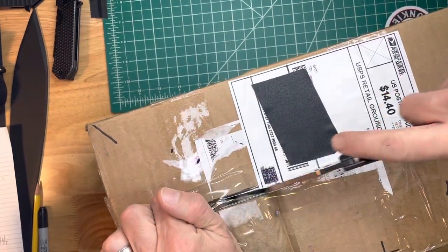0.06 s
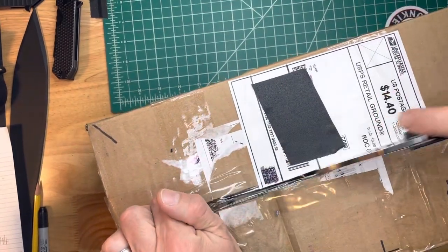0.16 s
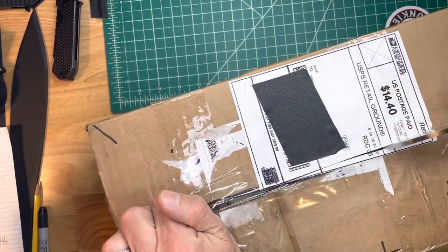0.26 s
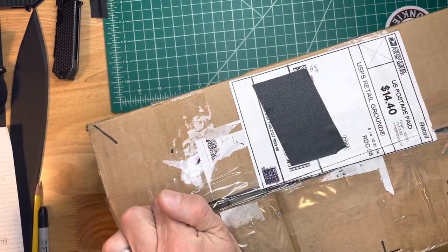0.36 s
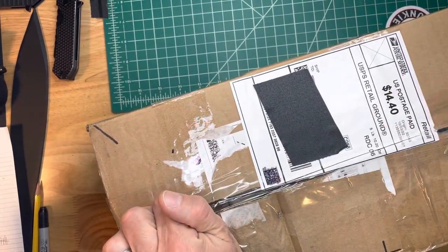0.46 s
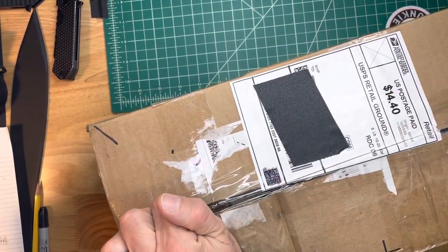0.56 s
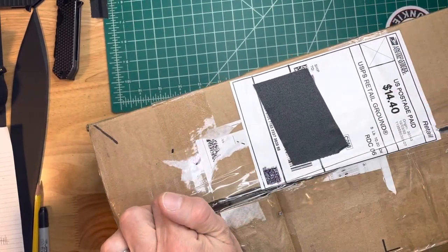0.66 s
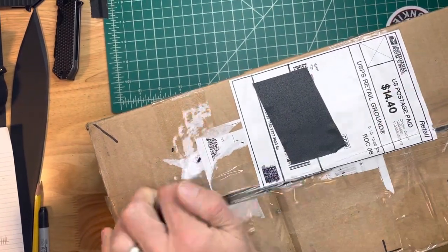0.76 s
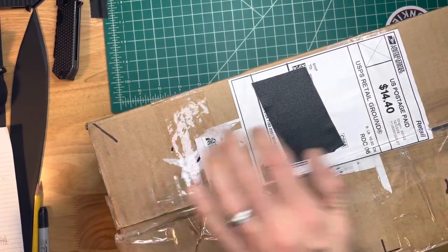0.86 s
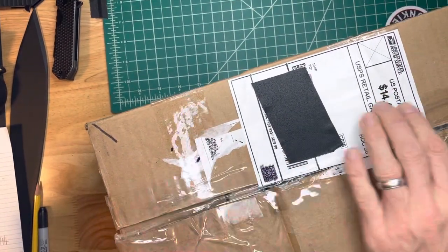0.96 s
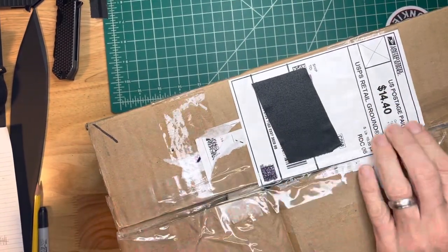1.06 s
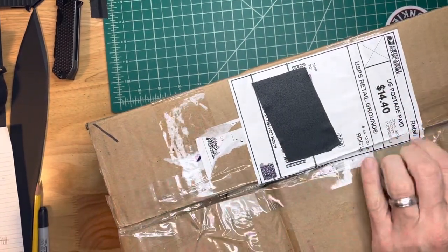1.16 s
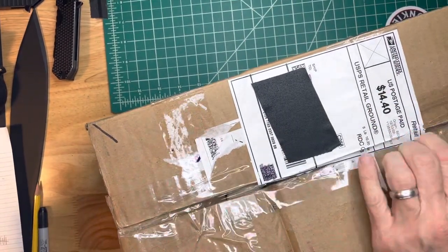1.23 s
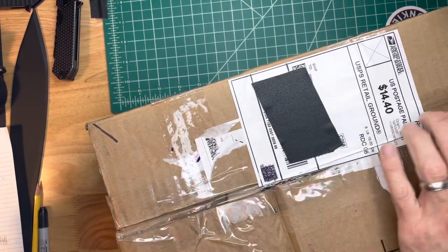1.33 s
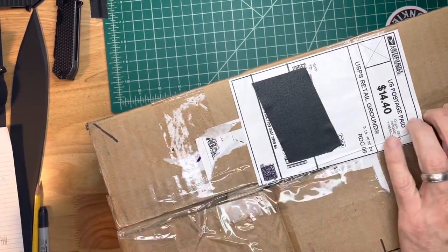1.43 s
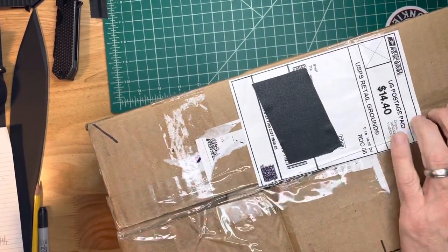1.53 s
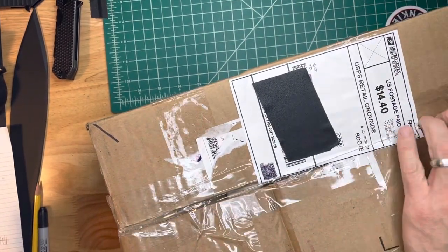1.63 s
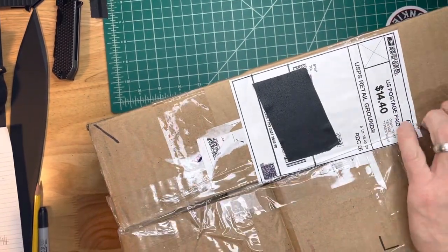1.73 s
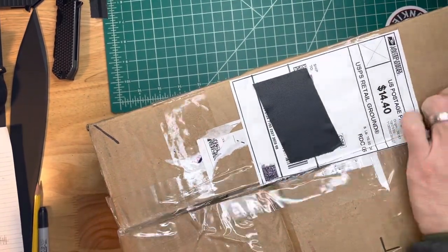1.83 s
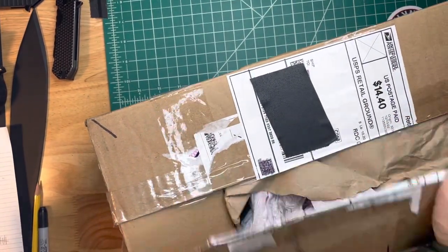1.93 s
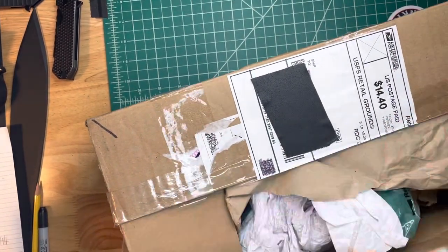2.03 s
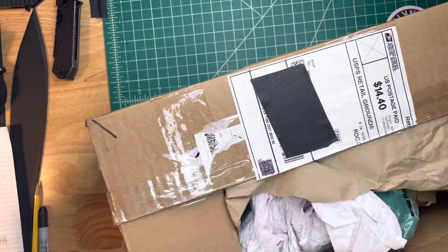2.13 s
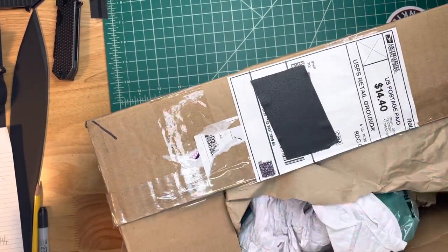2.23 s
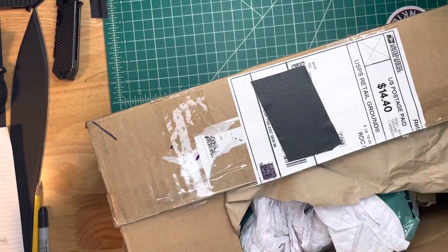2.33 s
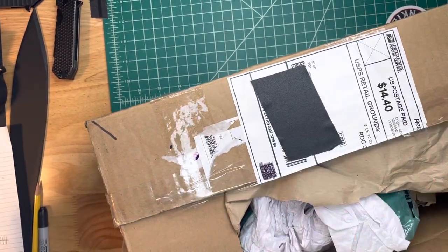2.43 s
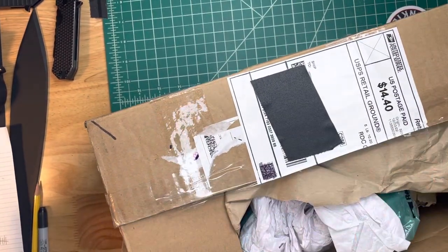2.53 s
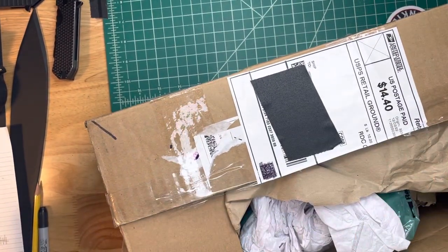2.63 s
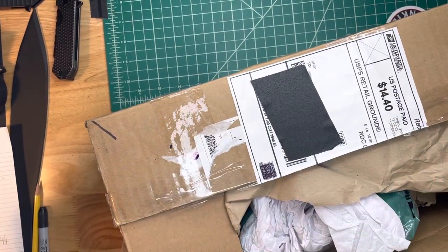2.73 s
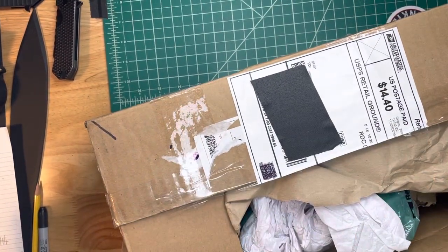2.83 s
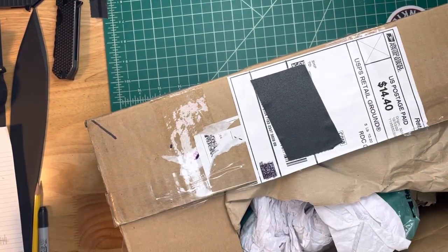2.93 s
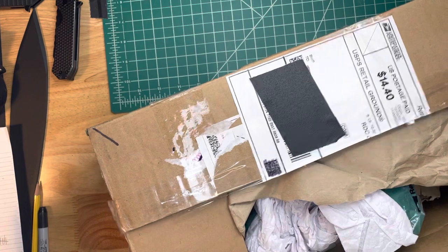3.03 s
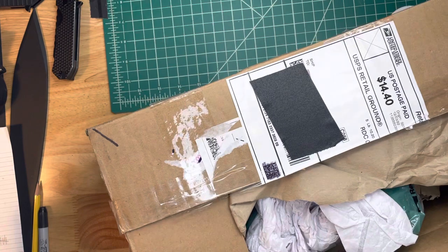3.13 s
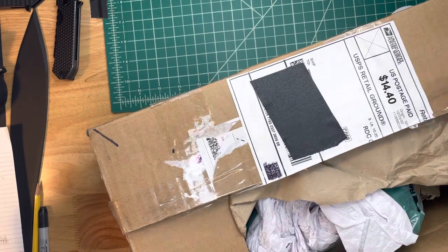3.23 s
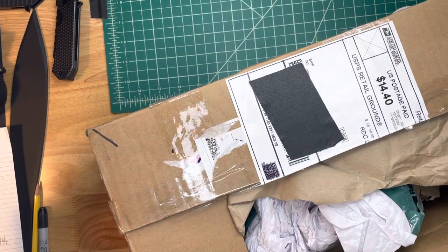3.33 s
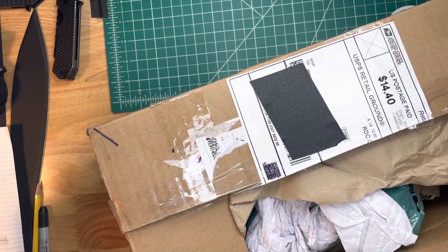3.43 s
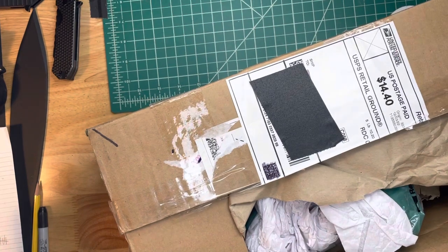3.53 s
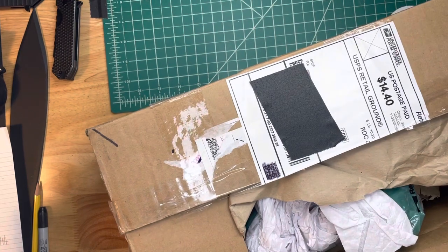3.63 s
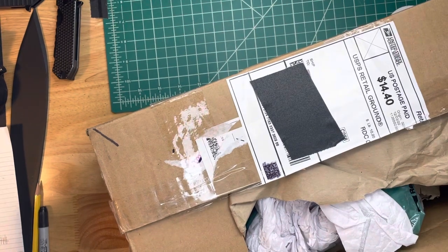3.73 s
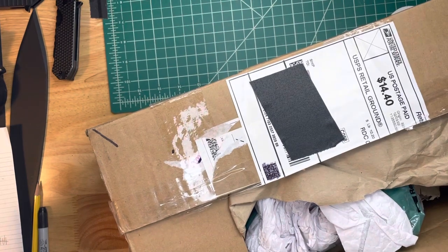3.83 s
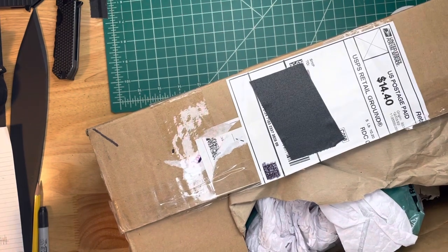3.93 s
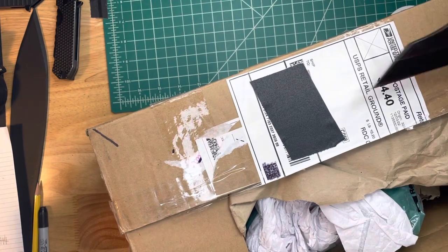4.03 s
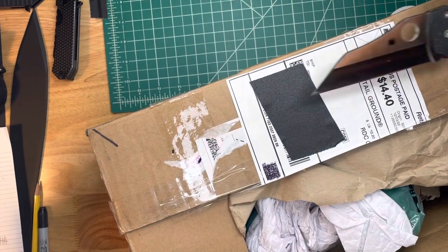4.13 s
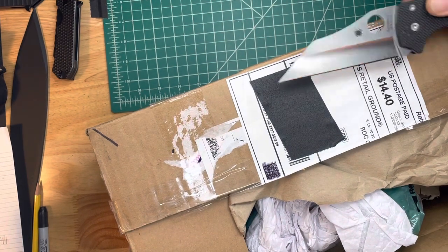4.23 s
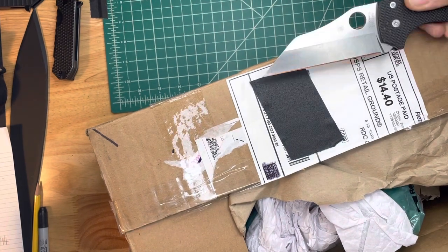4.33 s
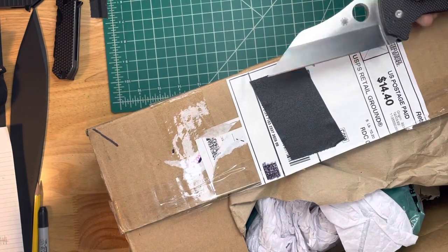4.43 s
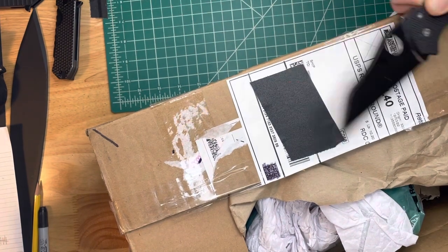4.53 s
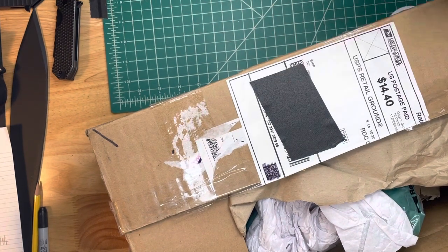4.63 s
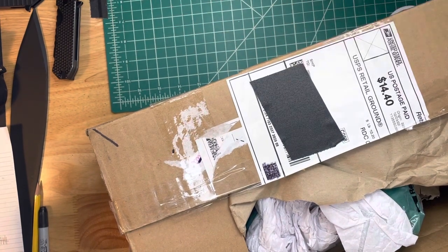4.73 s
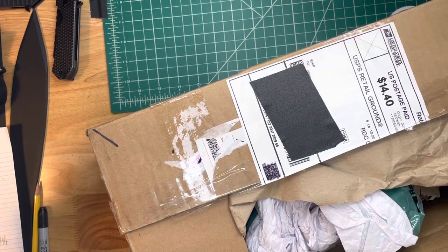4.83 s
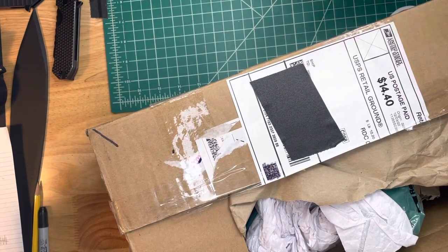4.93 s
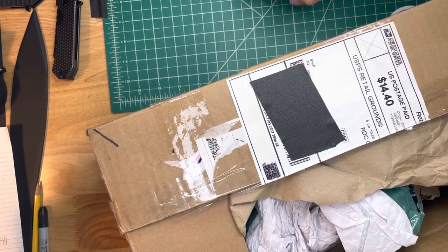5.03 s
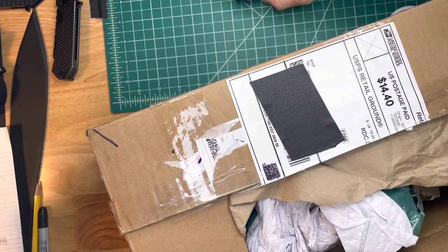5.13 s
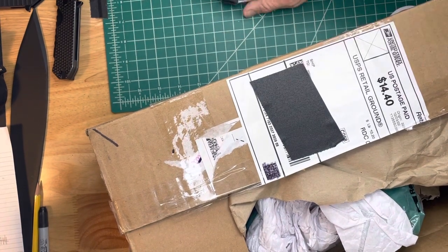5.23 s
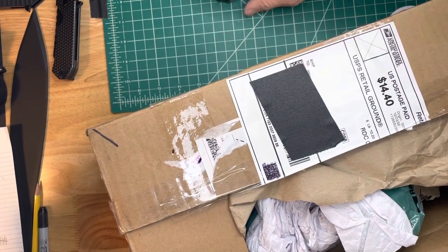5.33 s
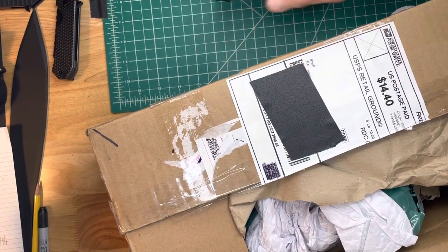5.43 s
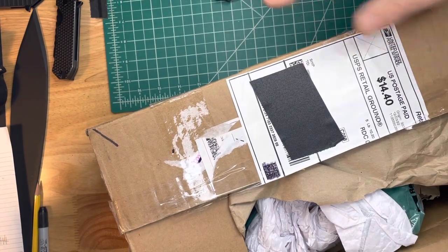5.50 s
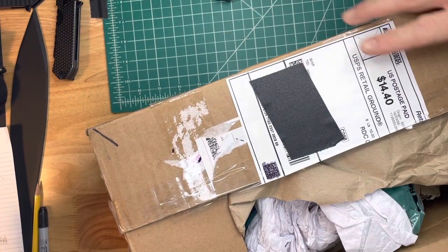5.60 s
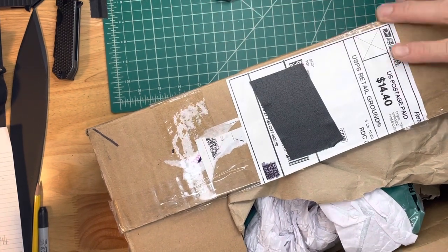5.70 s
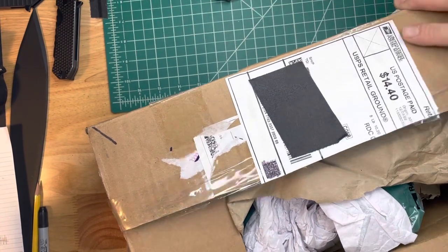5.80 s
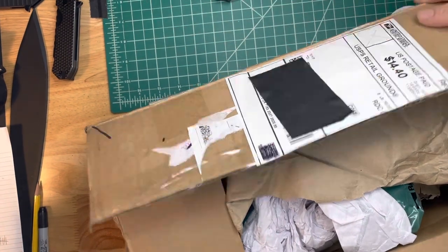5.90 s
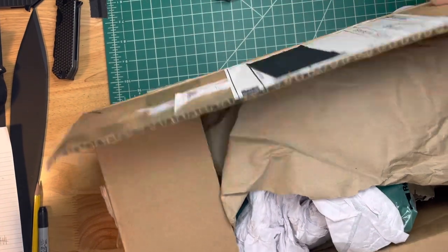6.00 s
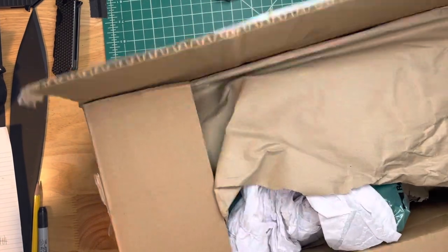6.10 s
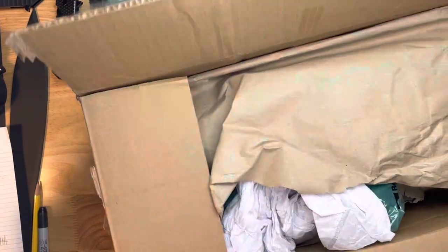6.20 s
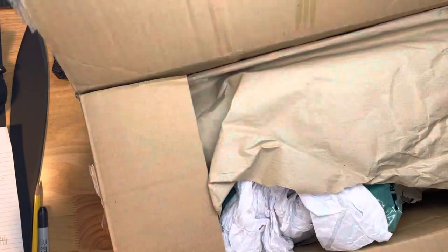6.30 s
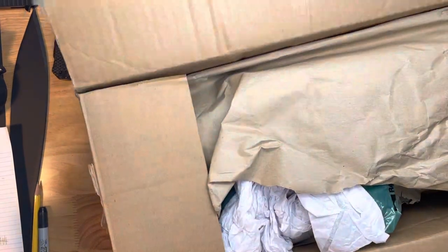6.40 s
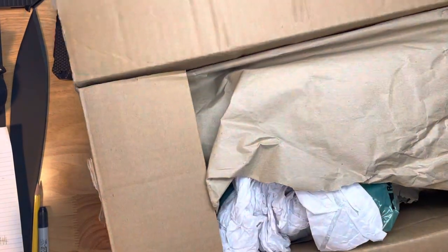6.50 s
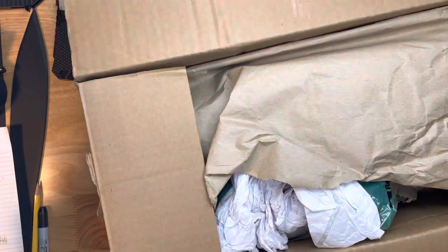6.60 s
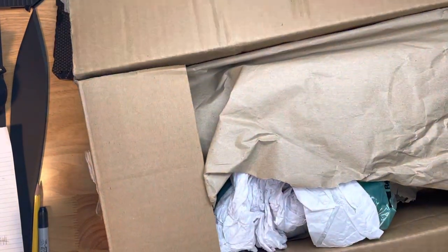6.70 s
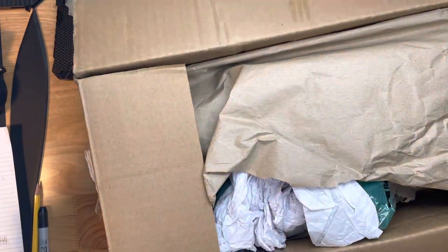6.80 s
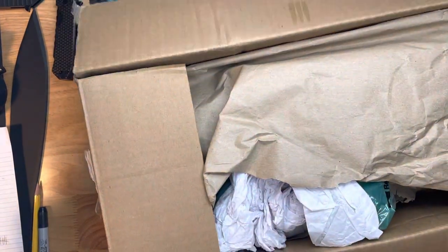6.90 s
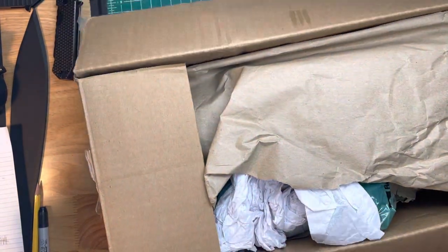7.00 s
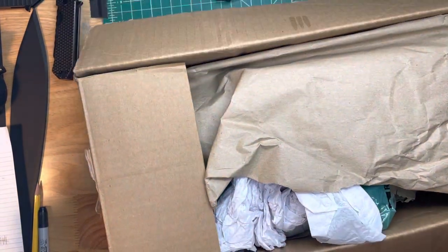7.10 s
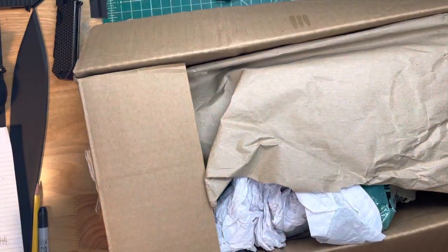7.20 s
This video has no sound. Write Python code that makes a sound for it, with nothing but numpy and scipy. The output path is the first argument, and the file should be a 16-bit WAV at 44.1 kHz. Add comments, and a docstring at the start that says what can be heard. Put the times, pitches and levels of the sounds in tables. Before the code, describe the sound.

Close stereo pickup at a desk in a small, dry, quiet room. From 0 to 0.8 s a knife cuts tape in abrupt gritty strokes, with sharp ticks, board clacks and dull hollow bumps. From 1 to 1.8 s come lighter crinkling tugs and small knocks, building to a dense, loud cluster of cracks and a boxy thump around 1.86 s as the first flap tears free. A soft paper swish follows at 2.1 s, then stronger scrapes and low hollow thuds from 2.8 to 3.45 s, heaviest near 3.25. It is almost silent until faint rubs and a scuff around 4.5 s. At 4.65 s a folding blade snaps shut, bright and metallic with a very brief ring. The knife settles with small hard taps from 5.1 to 5.4 s. At 5.87 s the second flap pops sharply with a short low boom, then its crease rustles quietly with tiny knocks until the end near 7.3 s.

```python
"""On a desk in a small room, a knife slits the tape of a cardboard box, heard by a close stereo microphone.
The first flap is pulled free and scrapes open over packing paper; the knife is folded and put down.
Then the second flap pops loose and swings back on its crease. Rubbing is made of many tiny slips, a hard
object's ring of fading sine waves. Snaps and thumps bend the board: their treble arrives first, so
each falls in pitch."""
import sys
import numpy as np
from scipy import signal
from scipy.fft import rfft, irfft, next_fast_len
from scipy.io import wavfile
from scipy.ndimage import uniform_filter1d, map_coordinates

SR = 44100
rng = np.random.default_rng(int(sys.argv[2]) if len(sys.argv) > 2 else 0)


def dump(signal):
    """Clip the signal to [-1, 1] and save it as 16-bit WAV at the path in sys.argv[1]."""
    limited = np.clip(np.atleast_2d(signal).T, -1, 1)
    pcm = np.round(limited * 32767).astype(np.int16)
    wavfile.write(sys.argv[1], SR, pcm)


N = 319749  # length of the scene in samples
T = np.arange(2 ** 13) / SR  # time axis of one blow, in seconds
HZ = np.fft.rfftfreq(len(T), 1 / SR)  # its frequencies
LEAD = .004  # seconds of soft noise rise placed before each sharp contact


def amp(db):
    """Turn decibels into a gain."""
    return 10 ** (np.asarray(db) / 20)


def unit(x):
    """Scale to an rms of 1."""
    return x / np.sqrt(np.mean(x ** 2) + 1e-20)


def crest(x):
    """Scale to a peak of 1."""
    return x / (np.abs(x).max() + 1e-20)


def along(points, hz):
    """Read a curve of (Hz, value) points on a log frequency axis."""
    f, v = np.transpose(points)
    return np.interp(np.log(hz + 1), np.log(f + 1), v)


def filtered(x, response):
    """Filter x by a gain, or complex response, that depends on frequency."""
    n = x.shape[-1]
    m = 2 * next_fast_len((n + SR // 10) // 2)
    spectrum = rfft(x, m) * response(np.fft.rfftfreq(m, 1 / SR))
    return irfft(spectrum, m)[..., :n]


def causal(gain):
    """Give a gain the phase that puts its energy as early as possible (minimum phase)."""
    cepstrum = irfft(np.log(np.maximum(gain, 1e-6)))
    half = len(cepstrum) // 2
    return np.exp(rfft(np.r_[cepstrum[0], 2 * cepstrum[1:half], np.zeros(half)]))


def hump(hz, centre_hz, octaves):
    """A broad resonance, symmetric on a log axis."""
    return 1 / (1 + (np.log2((hz + 1) / centre_hz) / octaves) ** 2) ** 2


def under(hz, edge_hz, order=8):
    """A steep low-pass gain."""
    return 1 / (1 + (hz / edge_hz) ** order)


def add(track, s, sound):
    """Mix a sound into the track at time s."""
    start = max(round(s * SR), 0)
    part = sound[:max(N - start, 0)]
    track[start:start + len(part)] += part


# How strained board colours the sound. Each row: frequency in Hz, level in dB per Hz.
STRAINED_BOARD = [(24, -52), (45, -15), (90, 0), (204, -4), (250, 4), (371, -3), (415, -2.5), (592, -10),
                  (741, -4), (1270, -17), (2150, -15), (2550, -21), (3500, -25.5), (5000, -75.5)]
# Pushes of the knife along the tape.
# Each row: start in seconds, length in seconds, level of the panel's rumble in dB, of the rasp in dB.
KNIFE_PUSHES = [(0.022, 0.038, -27, -30), (0.115, 0.02, -32.5, -34), (0.18, 0.096, -33.5, -40.5),
                (0.343, 0.1, -26, -36), (0.48, 0.15, -34, -42), (0.57, 0.11, -29, -41.5),
                (0.725, 0.056, -43.5, -47.5)]


def knife_cut():
    """The blade cuts the tape in abrupt strokes, with a gritty run of slips."""
    rows = strokes(KNIFE_PUSHES, attack_s=0.017, release_db_per_s=226.0, hiss_db=-46.5, hiss_grows=1.13)
    grit = slips(rate=600, spread_db=4.5, smooth=.25, clump_db=2, patchy_db=3.5)
    return friction(rows, STRAINED_BOARD, grit)


# Pulls on the first flap while shreds of tape still hold it.
# Each row: start in seconds, length in seconds, level of the panel's rumble in dB, of the rasp in dB.
FLAP_PULLS = [(0.972, 0.049, -45, -46), (1.09, 0.035, -44, -44.5), (1.145, 0.023, -38.5, -42.5),
              (1.26, 0.06, -39, -44), (1.36, 0.11, -46.5, -52), (1.54, 0.095, -41.5, -43.5),
              (1.635, 0.082, -37.5, -41.5), (1.765, 0.15, -35.5, -38.5), (1.868, 0.02, -25, -27)]


def flap_pull():
    """The tape crinkles in abrupt strokes as the flap tugs at it."""
    rows = strokes(FLAP_PULLS, attack_s=.016, release_db_per_s=229.5, hiss_db=-48.5, hiss_grows=0.78)
    crinkle = slips(rate=350, spread_db=5, smooth=.6, clump_db=2, patchy_db=3)
    return friction(rows, STRAINED_BOARD, crinkle)


# The freed flap dragging over the packing paper.
# Each row: start in seconds, length in seconds, level of the panel's rumble in dB, of the rasp in dB.
PAPER_DRAGS = [(2.06, 0.29, -46.5, -47.5), (2.465, .04, -51.5, -54), (2.875, 0.05, -47, -48),
               (2.95, 0.032, -29.5, -34), (3.03, 0.1, -32, -39), (3.2, 0.045, -23.5, -31),
               (3.31, 0.049, -33, -44), (3.425, 0.029, -27, -39)]


def flap_drag():
    """The flap swishes over paper in strokes that swell smoothly."""
    rows = strokes(PAPER_DRAGS, attack_s=.035, release_db_per_s=211.5, hiss_db=-47.0, hiss_grows=0.97)
    swish = slips(rate=800, spread_db=4, smooth=.8, clump_db=1, patchy_db=3)
    return friction(rows, STRAINED_BOARD, swish)


# How light sliding colours the sound. Each row: frequency in Hz, level in dB per Hz.
LIGHT_SLIDING = [(24, -35), (40, -2.5), (74, 0.5), (200, -5), (246, 2), (285, -4), (700, -0.5), (981, -9.5),
                 (1250, -9.5), (1370, -12), (1690, -11.5), (3500, -17), (5000, -60)]
# The second flap bending on its crease.
# Each row: time in seconds, levels there of the panel's rumble, the rasp and the hiss, all in dB.
CREASE_LEVELS = [(5.95, -55, -49, -60.5), (6.281, -51.5, -54.5, -60), (6.356, -48, -46, -52.5),
                 (6.7, -54, -46, -50.5), (6.879, -50.5, -49.5, -53.5), (7.074, -43.5, -45, -51),
                 (7.119, -52.5, -51.5, -65.5), (7.249, -53, -49, -51)]


def crease_bend():
    """The crease rustles as it bends, its levels gliding from row to row."""
    rustle = slips(rate=350, spread_db=5, smooth=1.5, clump_db=1, patchy_db=2.5)
    return friction(CREASE_LEVELS, LIGHT_SLIDING, rustle)


# Hands and knife sliding over desk and box.
# Each row: start in seconds, length in seconds, level of the panel's rumble in dB, of the rasp in dB.
HAND_SLIDES = [(3.74, 0.2, -66, -64), (3.96, 0.03, -56.5, -55.5), (4.15, 0.17, -76, -64),
               (4.34, 0.14, -57, -55.5), (4.52, 0.042, -45, -45), (4.85, 0.2, -51.5, -58.5),
               (5.09, .13, -51.5, -54), (5.27, 0.09, -35.5, -40), (5.47, 0.081, -52.5, -57),
               (5.675, 0.021, -36.5, -40.5), (5.77, 0.047, -49, -50.5)]


def hands_slide():
    """Skin and knife rub in soft strokes made of many fine slips."""
    rows = strokes(HAND_SLIDES, attack_s=.05, release_db_per_s=171.5, hiss_db=-49.0, hiss_grows=0.63)
    skin = slips(rate=900, spread_db=3.5, smooth=.8, clump_db=1, patchy_db=3)
    return friction(rows, LIGHT_SLIDING, skin)


def rubbing():
    """All rubbing together; the small panels radiate no deep bass."""
    flap = flap_pull() + flap_drag()
    mix = amp(1.0) * knife_cut() + amp(-1.0) * flap + hands_slide() + amp(-0.5) * crease_bend()
    return filtered(mix, lambda hz: 1 - under(hz, 28, order=4))


def strokes(rows, attack_s, release_db_per_s, hiss_db, hiss_grows):
    """Each stroke rises by 20 dB in attack_s, holds and dies away; its hiss level follows the rasp.
    Gives rows of time in seconds and rumble, rasp and hiss in dB; hiss_db belongs to a rasp of -40 dB."""
    start, length, rumble, rasp = np.transpose(rows)[:, :, None]
    t = np.arange(0, N / SR, .002)
    rise = -20 * np.maximum(start - t, 0) / attack_s
    fall = -release_db_per_s * np.maximum(t - start - length, 0)
    hiss = hiss_db + hiss_grows * (rasp + 40)
    # where strokes overlap, the strongest one counts
    levels = [np.max(db + rise + fall, axis=0) for db in (rumble, rasp, hiss)]
    heard = np.flatnonzero(levels[1] > -90)
    return np.column_stack([t, *levels])[heard[0]:heard[-1]]


def fibres(rate, spread_db, count=6):
    """Thick and thin fibres break independently, each in its own octave; rate per second and octave."""
    sizes = amp(spread_db * np.clip(rng.standard_normal(N), -2, 2)) * rng.choice([-1, 1], N)
    breaks = sizes * (rng.random((count, N)) < rate / SR)

    def octave_gain(hz):
        place = np.clip(np.log2((hz + 1) / 350), 0, count - 1)
        distance = place - np.arange(count)[:, None]
        return np.sqrt(np.maximum(1 - abs(distance), 0))

    return unit(filtered(breaks, octave_gain).sum(axis=0))


def slips(rate, spread_db, smooth, clump_db, patchy_db, clump_rate=90):
    """Tiny stick-slip releases of uneven size over smooth sliding; they come in clumps as the grip varies."""
    force = fibres(rate, spread_db) + smooth * rng.standard_normal(N)
    # grip wanders through clump_rate random values per second
    grip = map_coordinates(rng.standard_normal(2 ** 12), [np.arange(N) * clump_rate / SR], order=1)
    z = signal.stft(force * amp(clump_db * np.clip(grip, -2, 2)), nperseg=512)[2]
    # the contact point moves, so the resonances that it excites keep shifting
    field = uniform_filter1d(rng.standard_normal(z.shape), size=4, axis=0)
    field = uniform_filter1d(field, size=4, axis=1)
    return signal.istft(z * amp(patchy_db * np.clip(unit(field), -2, 2)), nperseg=512)[1][:N]


# How paper fibres colour the hiss. Each row: frequency in Hz, level in dB per Hz.
FIBRE_HISS = [(1500, -13.5), (3200, -6), (5600, 0), (7000, -6), (10000, -4), (13000, -12.5), (16000, -5)]


def friction(rows, tone, force):
    """Slips shake the panel, rasp on the board's surface and hiss in its fibres."""
    s, *levels = np.transpose(rows)
    t = np.arange(max(s[0] - .005, 0), min(s[-1] + .005, (N - 1) / SR), 1 / SR)
    gate = np.clip(np.minimum(t - s[0], s[-1] - t) / .01 + .5, 0, 1)  # soft start and end
    force = force[:len(t)]
    rumble = filtered(force, lambda hz: causal(amp(along(tone, hz)) * under(hz, 390)))
    rasp = filtered(force, lambda hz: amp(along(tone, hz)) * (1 - under(hz, 384)) * under(hz, 2890))
    hiss = filtered(force, lambda hz: amp(along(FIBRE_HISS, hz)) * (1 - under(hz, 1900)))
    bands = [unit(rumble), unit(rasp), amp(2.5) * unit(hiss)]
    out = np.zeros(N)
    add(out, t[0], gate * sum(amp(np.interp(t, s, db)) * band for db, band in zip(levels, bands)))
    return out


# Tape and fibres letting go, and hard taps, before small trims.
# Each row: time in seconds, crack level in dB, board clack in dB relative to it, clack centre in Hz.
RELEASES = [(0.0084, -21.5, 6, 1310), (0.0325, -25, 3.5, 1190), (0.0756, -21, 1.5, 920),
            (0.1412, -23, 6.5, 1190), (0.1951, -17.5, 2, 975), (0.3415, -22, -1, 800),
            (0.414, -24.5, -1, 900), (0.5621, -33.5, -9, 800), (0.6293, -32.5, 7.5, 800),
            (0.669, -27.5, -13, 710), (0.7442, -36, 5, 1210), (0.7626, -21, -9, 1770),
            (0.972, -38.5, 10.5, 1090), (1.0999, -30, -3.5, 680), (1.1351, -18, 8, 880),
            (1.2506, -36.5, 3.5, 894), (1.3296, -39, 7, 1000), (1.55, -29, -7.5, 700),
            (1.629, -22, 6.5, 1460), (1.6772, -26, 1, 700), (1.7544, -21.5, 0.5, 699),
            (1.819, -25.5, 5.5, 1510), (1.8552, -14.5, 0.5, 1466), (1.8605, -14, 3, 1248),
            (1.8701, -9, 5.5, 896), (1.8758, -20, 14.5, 1810), (1.8923, -22, 4.5, 798),
            (1.898, -12, -1.5, 1098), (1.902, -19.5, 7, 902), (2.228, -33.5, 1.5, 725),
            (2.4665, -37.5, 1, 630), (2.6098, -34, -8.5, 714), (2.9913, -25, 11.5, 800),
            (3.196, -24, -3, 910), (3.25, -15, -3.5, 690), (3.405, -33, 13, 805), (3.4291, -19, 3, 680),
            (3.46, -29.5, -5, 700), (4.1451, -29.5, -39.5, 665), (4.4794, -25, -6.5, 1020),
            (4.561, -30.5, -3.5, 680), (5.2281, -22, 2, 620), (5.2713, -27.5, -4, 1170),
            (5.297, -14, 4, 1030), (5.3346, -18.5, 7.5, 1080), (5.361, -30, 5, 900), (5.3946, -31, 10, 700),
            (5.673, -23, -7, 700), (5.8495, -26.5, -1.5, 710), (5.8734, -9.5, 0, 2200),
            (6.1577, -35, -24, 603), (6.4138, -33, -18, 700)]
# Colour of the crack. Each row: frequency in Hz, level in dB.
CRACK_TONE = [(1000, 2.5), (2500, -2), (3300, 3.5), (5500, 6), (7500, 2.5), (10000, 0.5), (13000, -5.5),
              (16000, -4)]


def snaps():
    """Each release ticks and cracks at the surface and clacks in the board."""
    out = np.zeros(N)
    surface = amp(along(CRACK_TONE, HZ))
    for s, db, clack_db, clack_hz in RELEASES:
        tick = burst(surface, t60=0.007, scatter=0.36, travel=0.0008, lead_t60=0.00086)
        crack = burst(surface, t60=0.037, scatter=0.27, travel=0.00131)
        board = hump(HZ, clack_hz, octaves=1.26) * liner(HZ) * under(HZ, 2900)
        clack = burst(board, t60=0.017, scatter=0.19, travel=0.00556)
        add(out, s - LEAD, amp(db) * tick + amp(db - 0.7) * crack + amp(db + clack_db - 0.5) * clack)
    return out


def burst(gain, t60, scatter, travel, lead_t60=0.0044):
    """A soft noise rise, then one sharp contact LEAD s in, then quickly fading noise; peak 1."""
    fade = np.where(T < LEAD, (LEAD - T) / lead_t60, (T - LEAD) / t60)
    force = scatter * rng.standard_normal(len(T)) * amp(-60 * fade)
    force[round(LEAD * SR)] += 1
    return crest(irfft(rfft(force) * causal(gain) * bend(travel)))


def bend(travel, knee_hz=230):
    """Bending waves: the lower the frequency, the later it arrives, by up to travel seconds."""
    delay = travel / (1 + HZ / knee_hz)
    return np.exp(-2j * np.pi * np.cumsum(delay) * HZ[1])


def liner(hz):
    """The board's stiff outer sheet favours the upper mids."""
    return 1 + amp(-3.5) * hump(hz, 1800, octaves=0.067) + amp(-1) * hump(hz, 2250, octaves=0.16)


# Panels flexing or being bumped, before a common trim.
# Each row: time in seconds, level in dB, centre in Hz.
PANEL_BUMPS = [(0.045, -22, 94), (0.267, -17.5, 269), (.442, -11.5, 347), (.668, -11, 370),
               (0.964, -20.5, 130), (1.135, -21.5, 99), (1.338, -28.5, 109), (1.406, -25.5, 75),
               (1.532, -28.5, 297), (1.628, -12.5, 279), (1.772, -11.5, 258), (1.846, -13, 610),
               (1.861, -5, 498), (1.873, -4, 289.5), (1.874, -6, 119.2), (1.908, -14, 189),
               (2.831, -12, 152), (2.968, -7, 150), (3.14, -17.5, 174.5), (3.179, -12.5, 168),
               (3.256, -2, 173), (4.515, -27, 72), (5.087, -32.5, 203), (5.228, -24.5, 290),
               (5.297, -23.5, 332), (5.334, -29, 262), (5.396, -23.5, 129), (5.892, -19.5, 71.5),
               (6.245, -31.5, 90), (6.326, -33.5, 91), (6.514, -30.5, 97), (6.608, -34, 100),
               (7.0, -34, 130)]
RECOIL_DB, RECOIL_HZ = -12, 300  # added to a snap's clack level before trims; centre of its thump


def thumps():
    """Bumps, and a recoil from every snap, send falling chirps across a box too small for deep bass."""
    out = np.zeros(N)
    recoils = [(s, db + clack_db + RECOIL_DB, RECOIL_HZ) for s, db, clack_db, _ in RELEASES]
    for s, db, centre_hz in PANEL_BUMPS + recoils:
        push = (HZ / centre_hz) ** 1.81 * under(HZ, 1.01 * centre_hz, order=5)
        push = push * (1 - under(HZ, 36, order=4))
        echoes = edges(back_db=-12.0, longest=0.05, damping_db_per_khz=18.5)
        wave = irfft(causal(push) * bend(travel=0.013) * echoes)
        add(out, s, amp(db - 3.0) * crest(wave))
    return out


def edges(back_db, longest, damping_db_per_khz, count=5):
    """The wave comes back from the panel's edges, weaker and duller after each longer trip (in s)."""
    trips = (np.arange(count) + .5 + rng.random(count)) / count  # as parts of the longest
    sizes = rng.choice([-1, 1], count) * amp(back_db * (0.5 + trips))
    dulling = amp(-damping_db_per_khz * np.outer(trips, HZ / 1000))
    delays = np.exp(-2j * np.pi * np.outer(trips * longest, HZ))
    return 1 + sizes @ (dulling * delays)


# The hollow box's low modes. Each row: frequency in Hz, level in dB.
BOX_MODES = [(72, -7.5), (168, 2.5), (245, 1), (348, -14), (484, 3.5), (727, -19)]


def box_ring(x, t60=0.19):
    """The hollow box rings on briefly in its low modes."""
    fade = amp(-60 * T / t60)
    ring = fade * sum(amp(db) * np.sin(2 * np.pi * hz * T) for hz, db in BOX_MODES)
    return signal.fftconvolve(x, ring / np.abs(rfft(ring)).max())[:N]


# Short scrapes and dull knocks of flap, hand and knife.
# Each row: start in seconds, end in seconds, level in dB, first ring in Hz, last ring in Hz.
SCRAPES_AND_KNOCKS = [(1.17, 1.188, -34, 560, 693), (1.206, 1.213, -38.5, 599, 449),
                      (1.302, 1.304, -29, 760, 690), (1.86, 1.897, -21, 862, 644),
                      (2.128, 2.16, -46, 622, 765), (2.945, 2.986, -31, 692, 660),
                      (3.077, 3.128, -26, 327, 429.5), (3.179, 3.214, -19.5, 311, 602),
                      (3.208, 3.265, -20, 690, 690), (3.424, 3.435, -22, 620, 590),
                      (4.508, 4.57, -41, 738.5, 623), (5.072, 5.104, -43, 1603, 1304),
                      (5.301, 5.39, -32.5, 549.3, 457), (6.351, 6.375, -51, 2180, 2200),
                      (6.43, 6.477, -49.5, 700, 700), (6.914, 6.921, -38, 587, 590),
                      (6.999, 7.004, -37.5, 560, 400), (7.129, 7.137, -52, 3430, 3680)]
SLIPS_PER_CYCLE = .47  # the higher the rings, the more often it slips


def scrapes(jitter=.2, size_db=2, detune=.12, cycles=6):
    """Uneven catching and slipping; each slip rings what is touched, its pitch gliding from first to last."""
    out = np.zeros(N)
    t = T[:2 ** 10]
    for start, end, db, start_hz, end_hz in SCRAPES_AND_KNOCKS:
        rate = SLIPS_PER_CYCLE * (start_hz + end_hz) / 2
        length = np.clip(end - start, .005, .12)
        chance = rng.standard_normal((2 ** 7, 3))
        gaps = np.exp(jitter * chance[:, 0]) / rate
        times = np.cumsum(gaps) - gaps[0]
        times, chance = times[times < length], chance[times < length]
        hz = np.interp(times, [0, length], [start_hz, end_hz]) * np.exp(detune * chance[:, 2])
        turns = np.outer(hz, t)  # cycles completed by each ring
        fade = amp(size_db * chance[:, 1:2] - 60 * turns / cycles)
        rings = fade * (1 - np.exp(-turns)) * np.sin(2 * np.pi * turns)
        # pressure swells and eases
        rings *= np.sin(np.pi * (times[:, None] + gaps[0]) / (length + 2 * gaps[0])) ** .5
        places = (times[:, None] * SR).astype(int) + np.arange(len(t))
        wave = np.bincount(places.ravel(), rings.ravel())
        add(out, start, amp(db) * wave / np.sqrt(np.sum(wave ** 2) / (length * SR)))
    return out


POP_S, POP_DB = 5.8722, -11  # when the second flap springs free, in seconds, and its level
# The flap's modes. Each row: frequency in Hz, level in dB, time to fade by 60 dB in seconds.
FLAP_MODES = [(247.3, -3.5, 0.27), (369, 10, .056), (482, -5.5, .1), (768, -2.5, .022)]


def flap_pop():
    """The released flap booms in its low modes; its crack is among the RELEASES."""
    out = np.zeros(N)
    boom = irfft(rfft(ringing(FLAP_MODES, vary_db=1.0)) * bend(travel=0.015))
    add(out, POP_S, amp(POP_DB) * boom)
    return out


def ringing(modes, vary_db):
    """A struck object's modes build up in a cycle or two; each blow shares its energy a little differently."""
    out = np.zeros(len(T))
    for hz, db, t60 in modes:
        fade = amp(db + vary_db * rng.standard_normal() - 60 * T / t60)
        out += fade * (1 - np.exp(-hz * T)) * np.sin(2 * np.pi * hz * T)
    return out


# The blade folding shut. Each row: time in seconds, peak of the scatter in dB.
LOCK_CLICKS = [(4.6512, -26.5), (4.6572, -4.5), (4.66, -9), (4.673, -18.5)]
# Colour of the scatter. Each row: frequency in Hz, level in dB.
LOCK_COLOUR = [(300, -14), (650, -7.5), (2400, -5.5), (3400, 0), (4600, 0.5), (5700, 7.5), (10000, -3.5),
               (16000, -5.5)]
# The blade's modes. Each row: frequency in Hz, level in dB, time to fade by 60 dB in seconds.
BLADE_MODES = [(1840, -9, .1), (3120, -4, .085), (4048, -11, .12), (5157, -5, .07), (5825, 0, .09)]


def knife_lock(ring_db=-35.0):
    """The blade snaps into its handle: a short bright scatter, and a ring that the hand damps."""
    out = np.zeros(N)
    for s, db in LOCK_CLICKS:
        click = burst(amp(along(LOCK_COLOUR, HZ)), t60=0.017, scatter=0.38, travel=0.0022)
        add(out, s - LEAD, amp(db) * click)
        add(out, s, amp(db + ring_db) * ringing(BLADE_MODES, vary_db=4.0))
    return out


# The folded knife touching down and rocking on the desk. Each row: time in seconds, level in dB.
DESK_CONTACTS = [(5.075, -37), (5.086, -30.5), (5.167, -41.5), (5.297, -25.5), (5.3341, -22), (5.36, -35)]
# The handle's modes. Each row: frequency in Hz, level in dB, time to fade by 60 dB in seconds.
HANDLE_MODES = [(1070, -2.5, 0.056), (1226, -3, 0.14), (1414, -7.5, .04), (1695, -7.5, .06),
                (2120, -7, 0.034)]


def knife_down():
    """Each contact with the desk rings the knife's handle."""
    out = np.zeros(N)
    for s, db in DESK_CONTACTS:
        add(out, s, amp(db) * ringing(HANDLE_MODES, vary_db=5.0))
    return out


# How long the room rings. Each row: frequency in Hz, time to fade by 60 dB in seconds.
ROOM_FADE = [(100, 0.44), (500, 0.15), (3000, 0.19), (12000, 0.19)]
# How far the room's sound spreads sideways. Each row: frequency in Hz, level of the side signal in dB.
ROOM_WIDTH = [(150, -25.5), (600, 3.5), (2200, -2.5), (3200, 9), (5500, -15.5), (16000, -45.5)]


def room(x):
    """A small room's tail of fading noise, almost alike on both sides in the bass."""
    hz, t, z = signal.stft(rng.standard_normal((2, SR // 2)), SR, nperseg=256)
    fade = amp(-60 * t / along(ROOM_FADE, hz)[:, None])
    tails = signal.istft(z * fade, SR, nperseg=256)[1]
    tails = np.pad(tails / np.linalg.norm(tails[0]), ((0, 0), (SR // 250, 0)))  # starts 4 ms late
    mid, side = signal.fftconvolve(x[None], tails, axes=1)[:, :N]
    side = filtered(side, lambda f: amp(along(ROOM_WIDTH, f)))
    return np.array([mid + side, mid - side])


# Colour of the quiet background. Each row: frequency in Hz, level in dB.
AIR_TONE = [(18, -41), (30, -13.5), (124, 3.5), (427, 0.5), (700, -11), (6500, -12), (9500, -50)]


def quiet_air():
    """The room's quiet air is steady coloured noise."""
    return unit(filtered(rng.standard_normal(N), lambda hz: amp(along(AIR_TONE, hz))))


def scene():
    """All handling sounds in the room, over its quiet air."""
    blows = thumps()
    box = blows + amp(2) * box_ring(blows)
    board = box + scrapes() + snaps() + rubbing() + flap_pop() + knife_down()
    lock = knife_lock()
    echo = amp(-12.0) * room(board) + amp(-9.5) * room(lock)
    return board + lock + echo + amp(-62.5) * quiet_air()


# Balance of the microphone pair. Each row: frequency in Hz, left minus right in dB.
LEFT_BALANCE = [(50, 0.5), (150, 1.5), (330, 5), (700, 4), (1400, 0.5), (16000, -0.5)]
# Timing of the pair. Each row: frequency in Hz, phase by which left leads in radians.
LEFT_LEAD = [(2400, 0), (3300, 1.2), (5000, .2), (7700, 3.1), (10000, 5.6), (14300, 9.4), (16000, 10.3)]
TOP_HZ = 15900  # band limit


def record(dry):
    """The left side is stronger in the low mids and leads in the treble; nothing passes the band limit."""
    sides = np.array([[.5], [-.5]])  # each side takes half of the difference

    def pickup(hz):
        lead = np.interp(hz, *np.transpose(LEFT_LEAD))
        return amp(sides * along(LEFT_BALANCE, hz)) * np.exp(1j * sides * lead)

    pair = filtered(dry, pickup)
    pair = pair / (1 + (pair / .93) ** 8) ** (1 / 8)  # the loudest peaks are rounded off
    return filtered(pair, lambda hz: hz < TOP_HZ)


dry = scene()
out = record(dry)
dump(out)
```